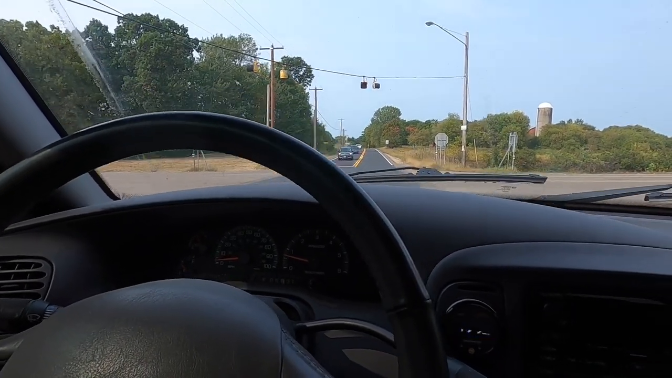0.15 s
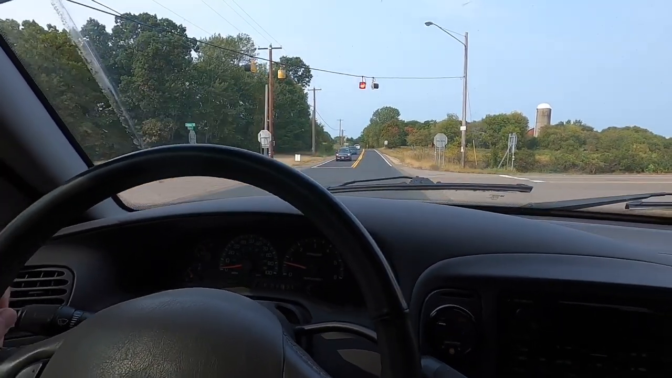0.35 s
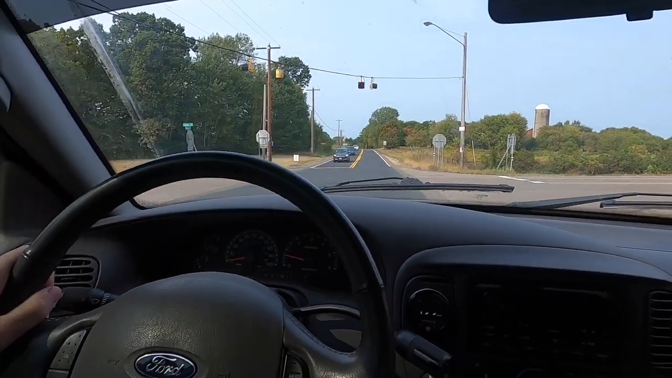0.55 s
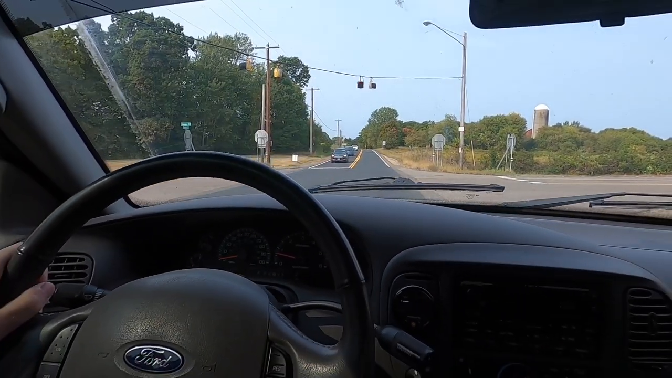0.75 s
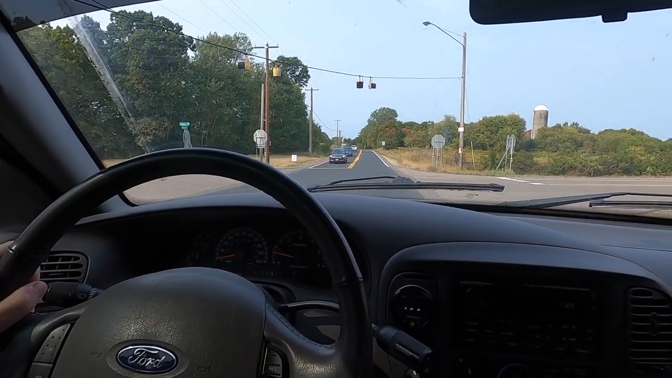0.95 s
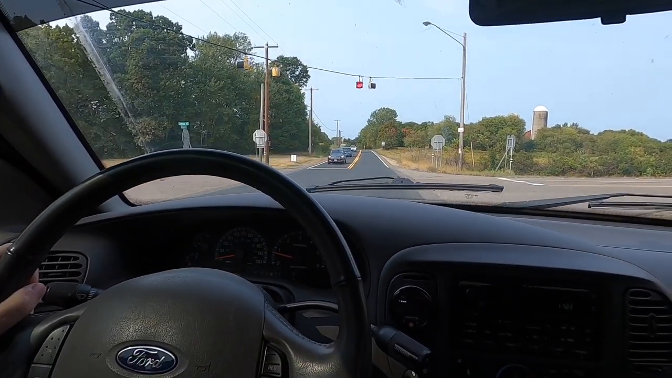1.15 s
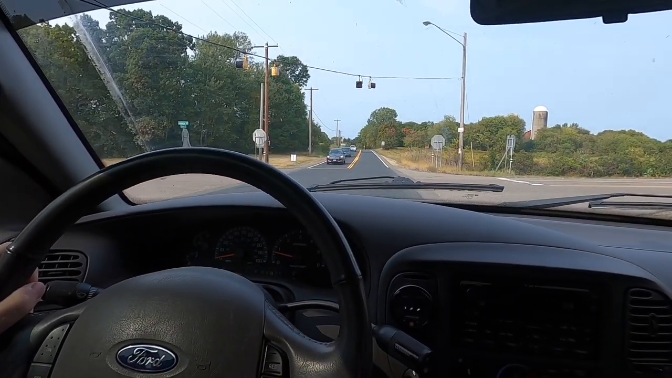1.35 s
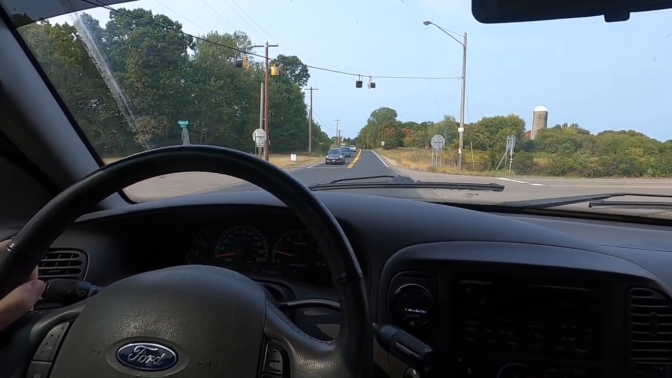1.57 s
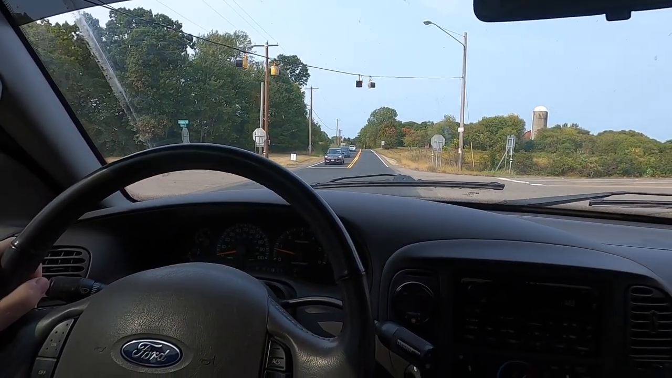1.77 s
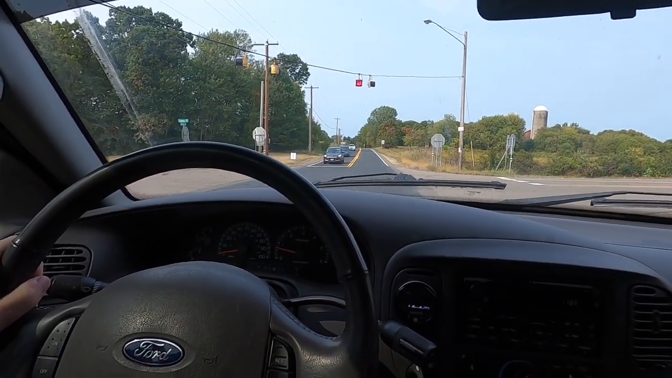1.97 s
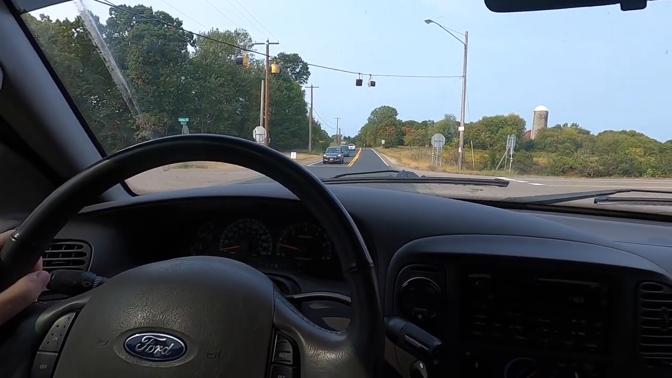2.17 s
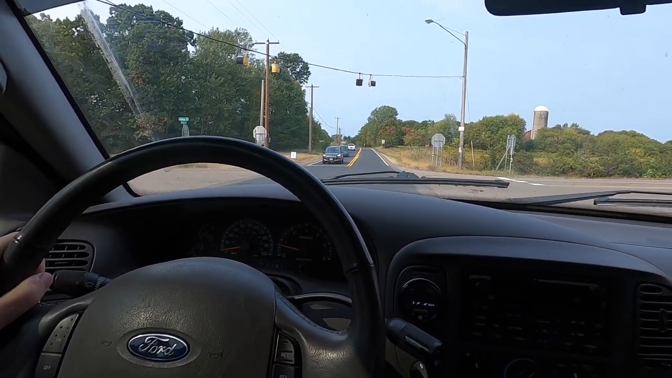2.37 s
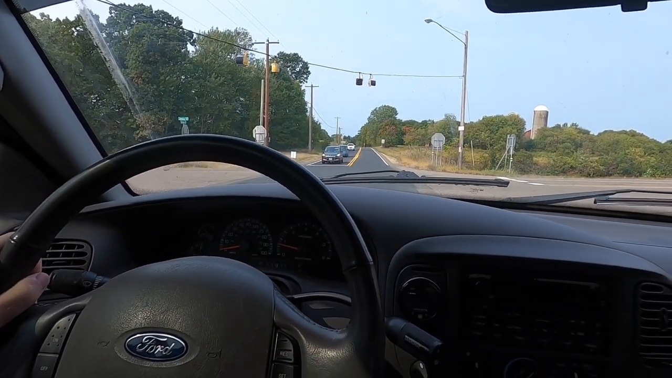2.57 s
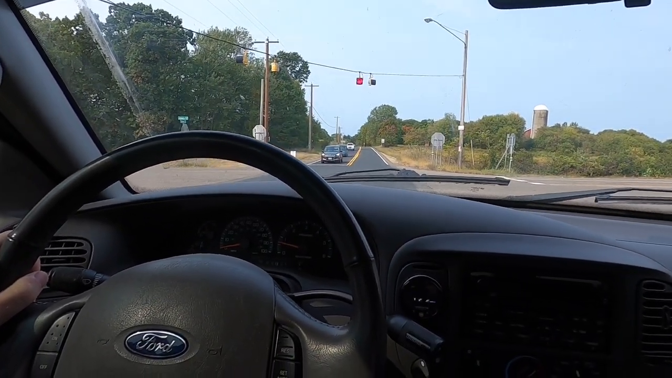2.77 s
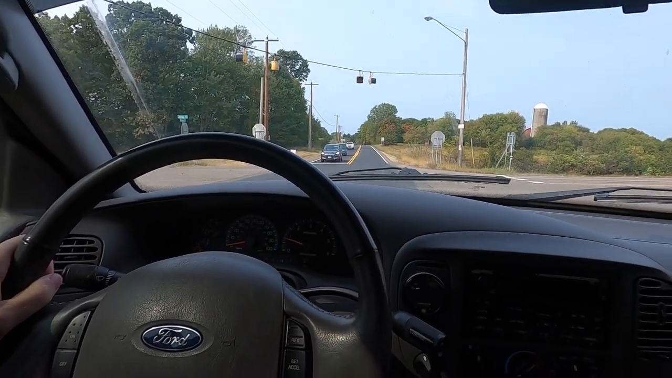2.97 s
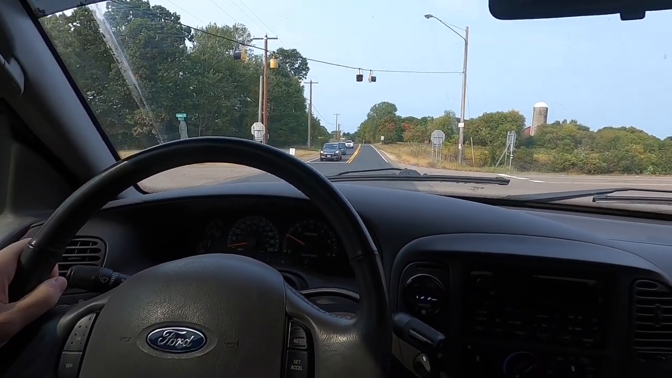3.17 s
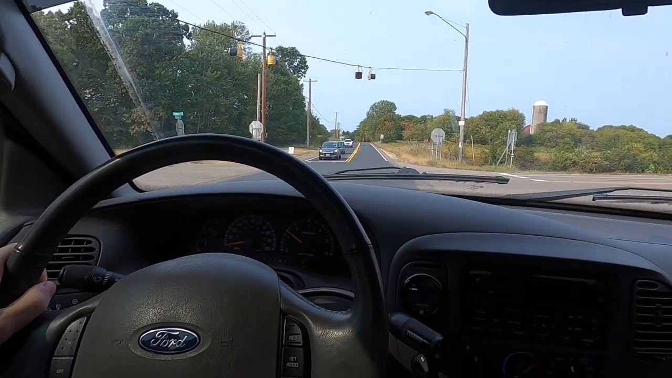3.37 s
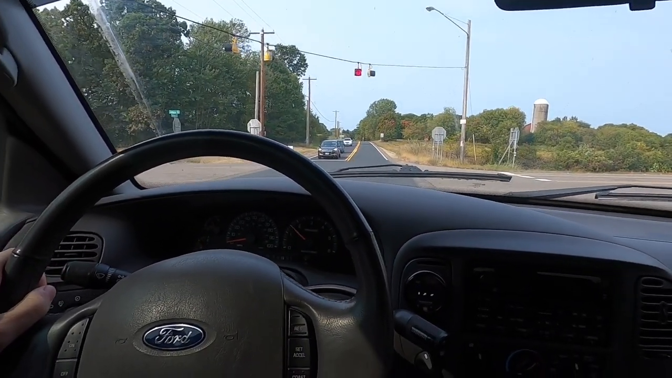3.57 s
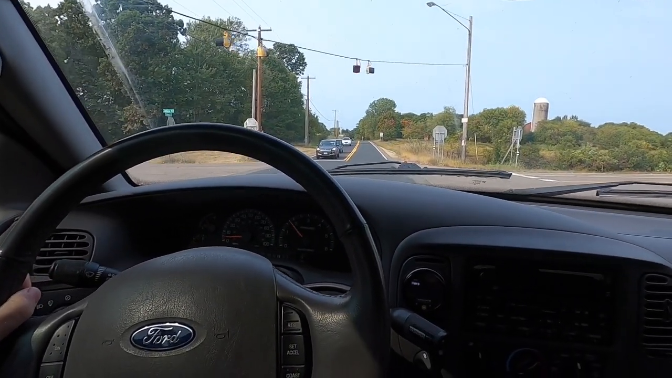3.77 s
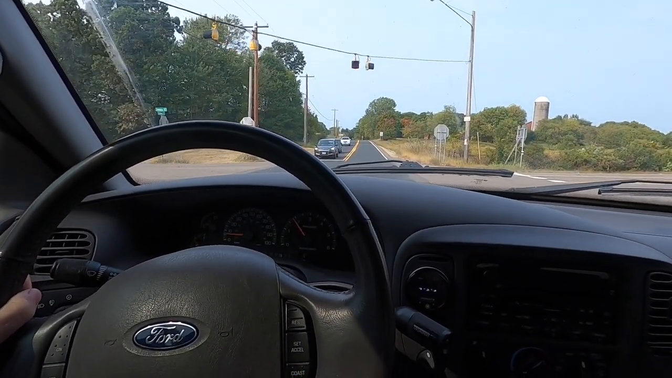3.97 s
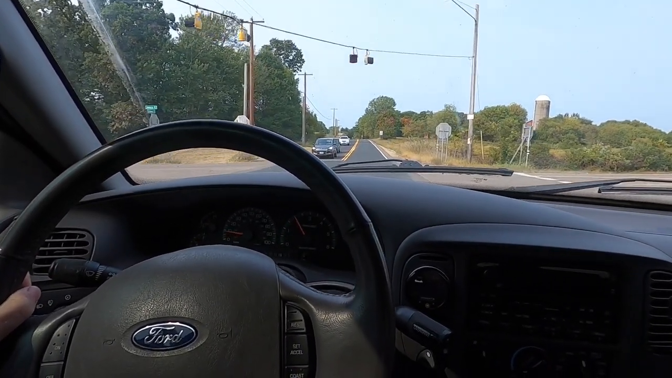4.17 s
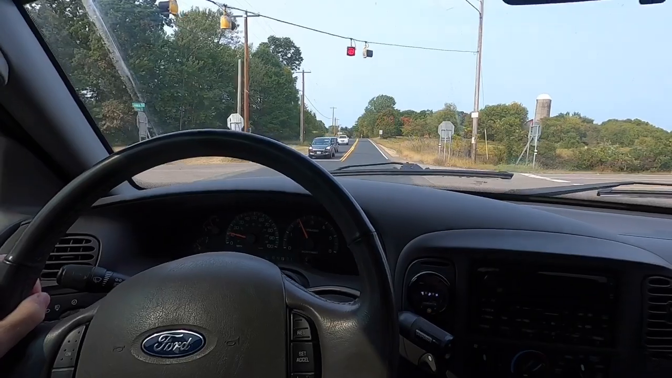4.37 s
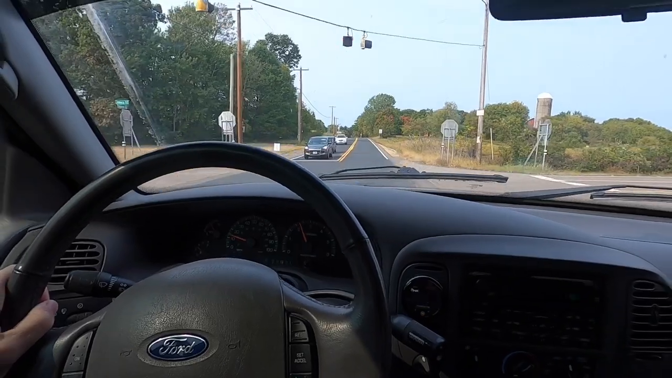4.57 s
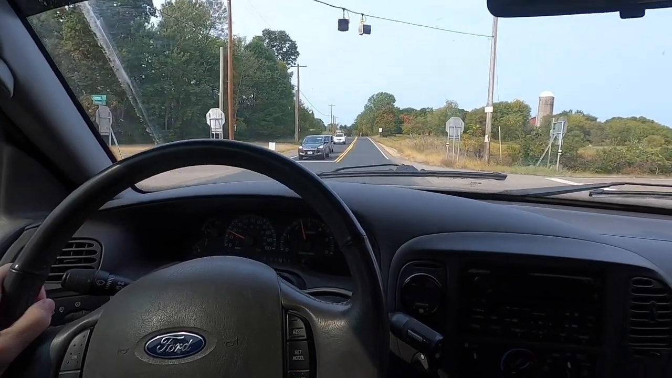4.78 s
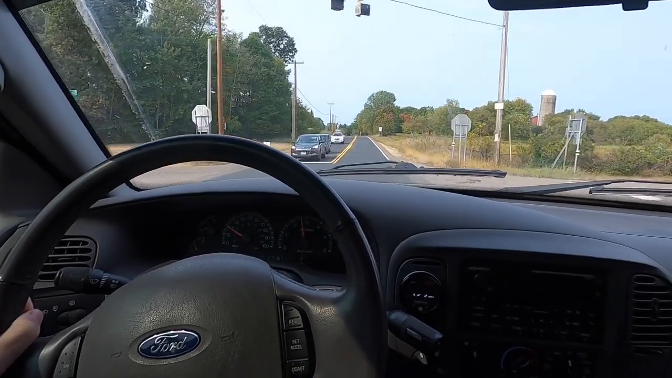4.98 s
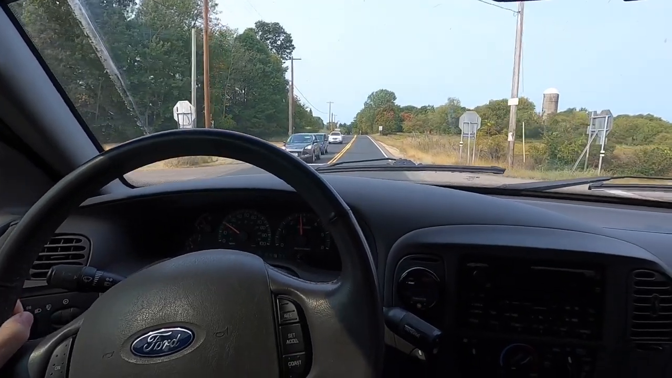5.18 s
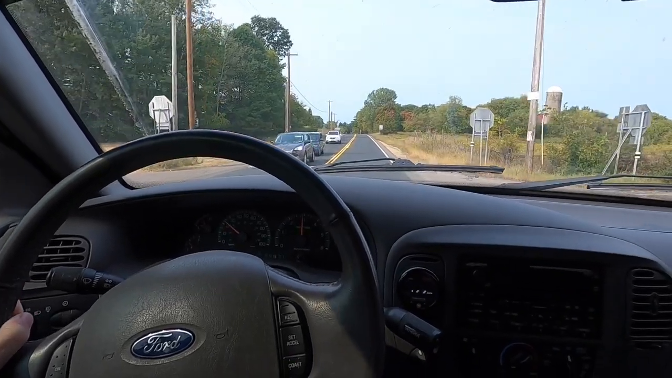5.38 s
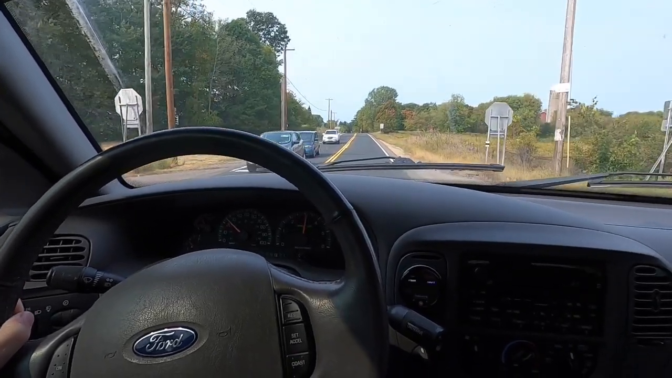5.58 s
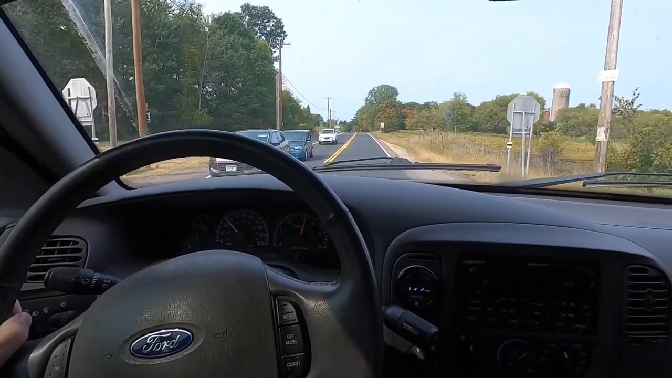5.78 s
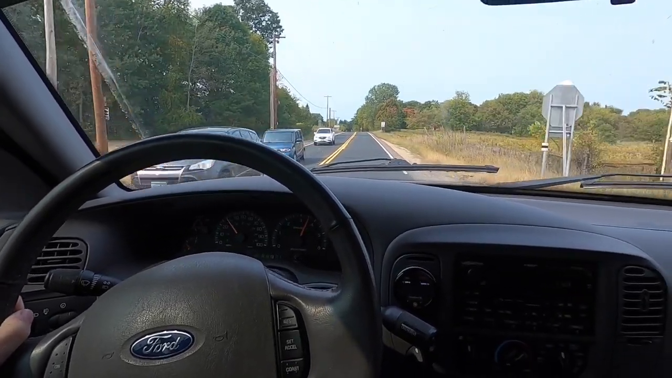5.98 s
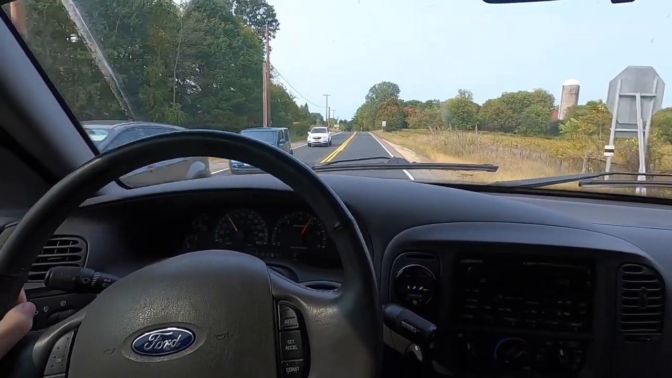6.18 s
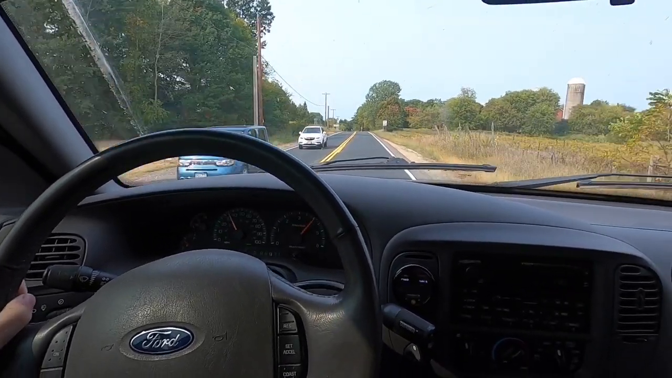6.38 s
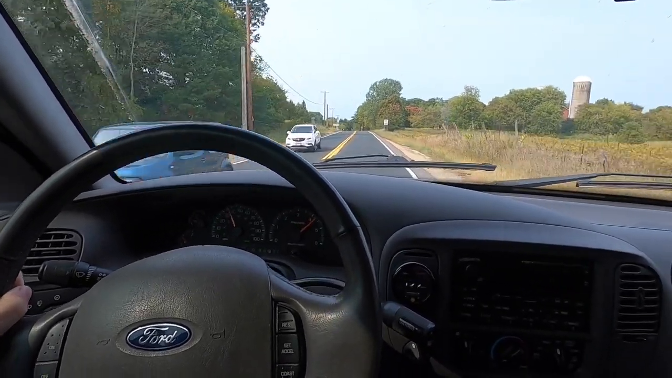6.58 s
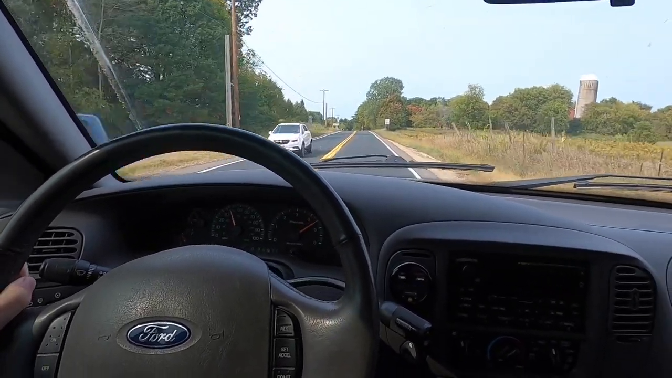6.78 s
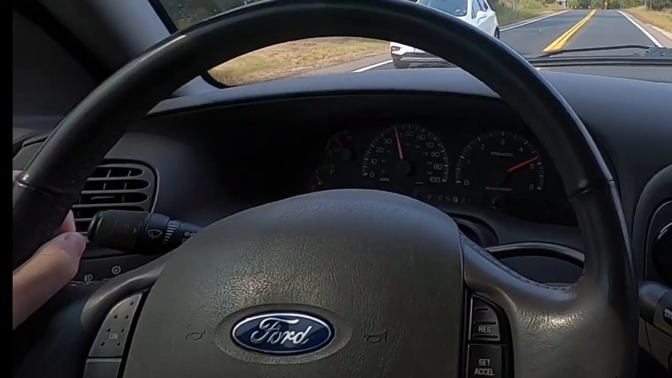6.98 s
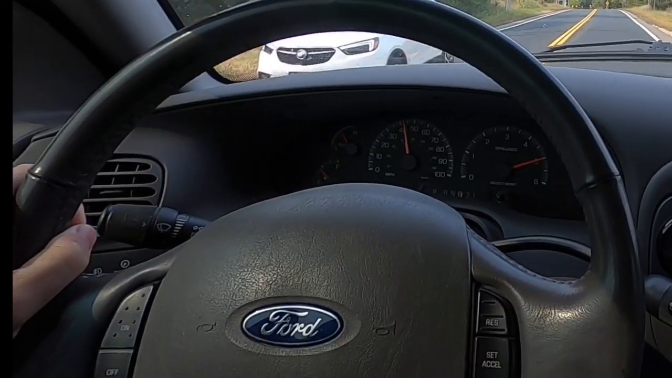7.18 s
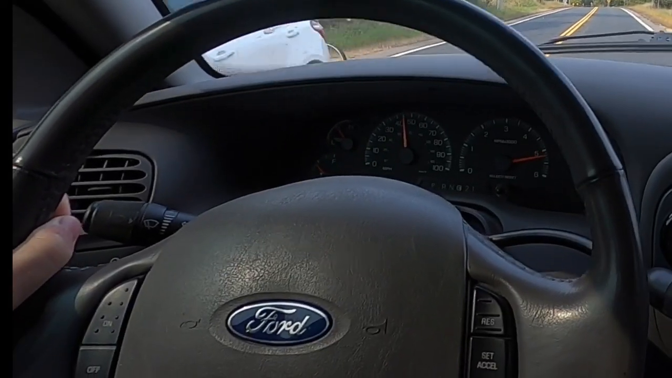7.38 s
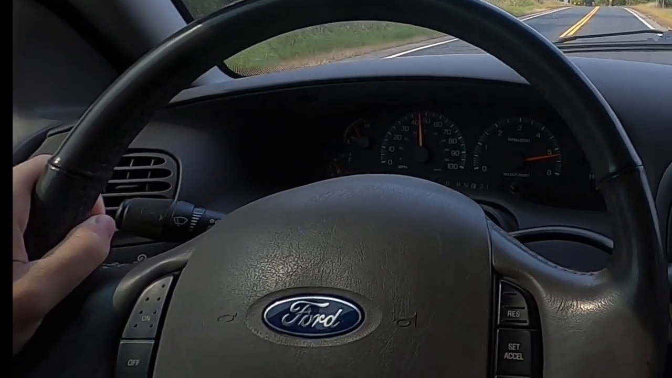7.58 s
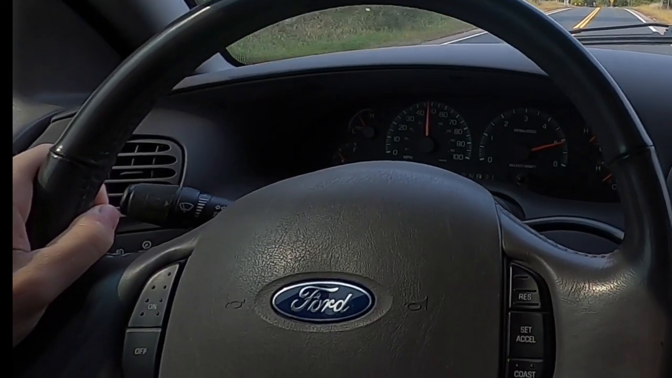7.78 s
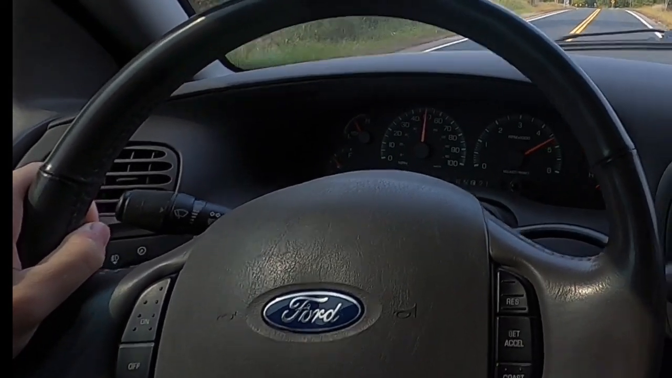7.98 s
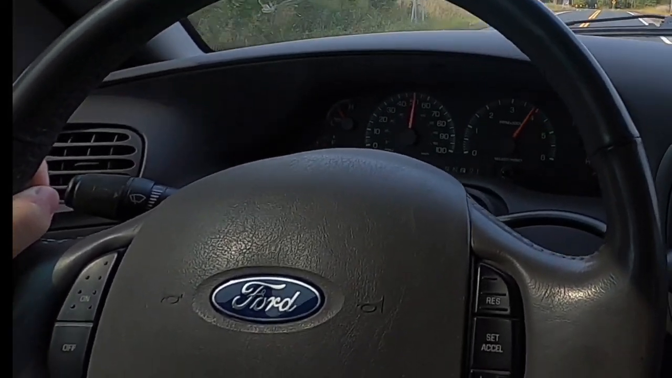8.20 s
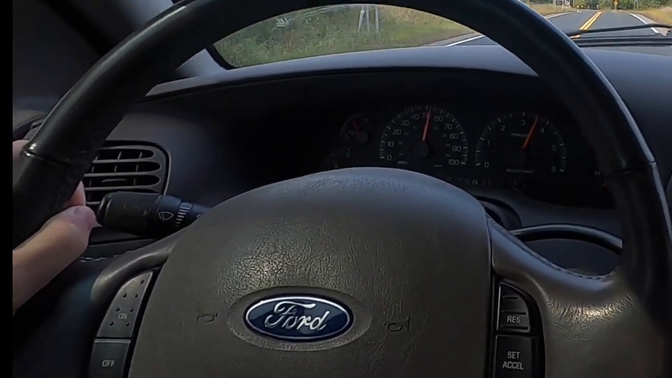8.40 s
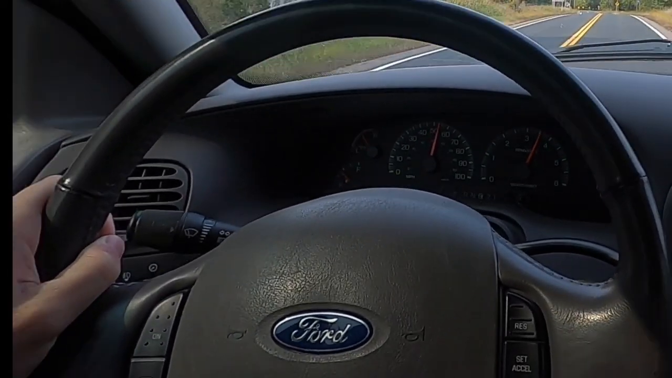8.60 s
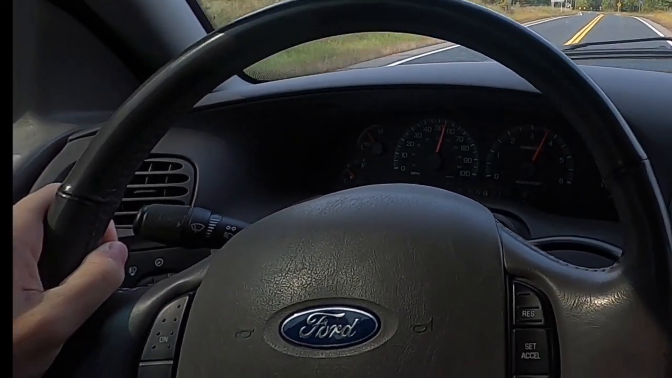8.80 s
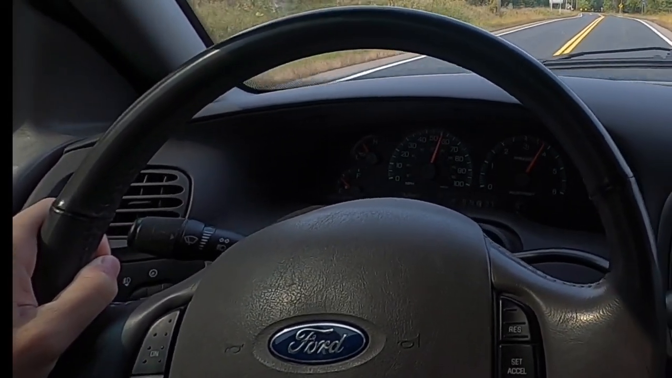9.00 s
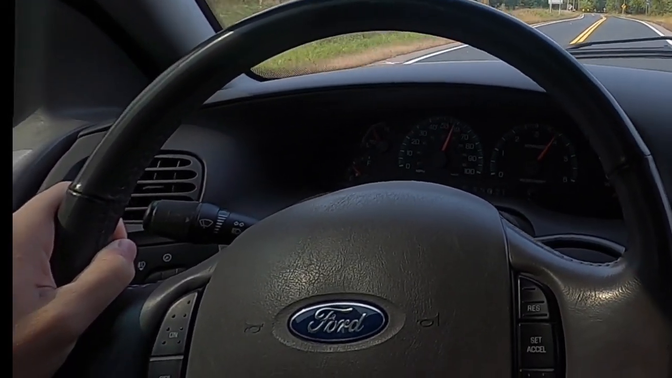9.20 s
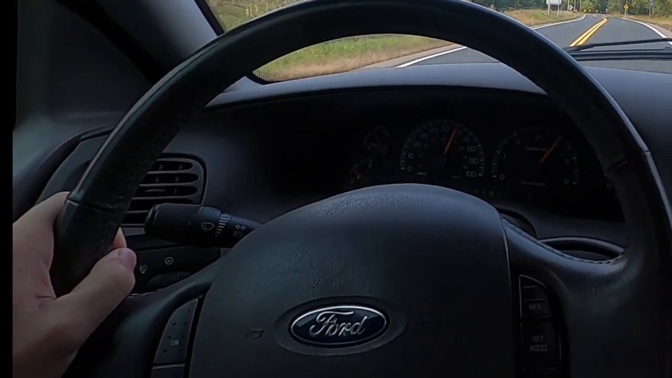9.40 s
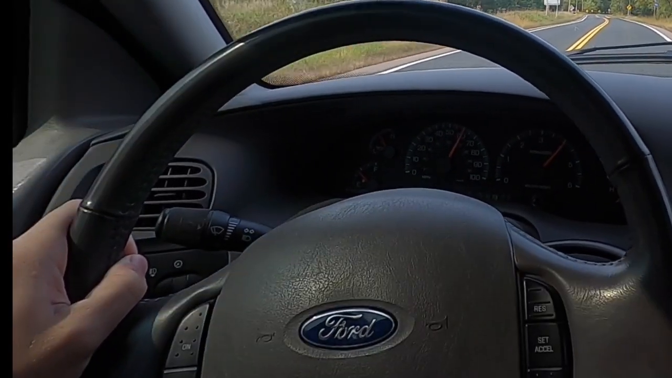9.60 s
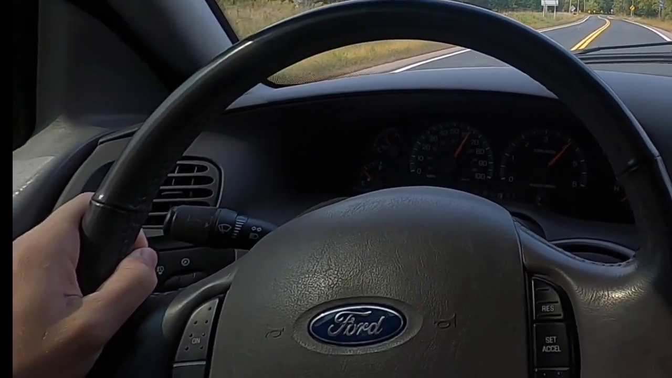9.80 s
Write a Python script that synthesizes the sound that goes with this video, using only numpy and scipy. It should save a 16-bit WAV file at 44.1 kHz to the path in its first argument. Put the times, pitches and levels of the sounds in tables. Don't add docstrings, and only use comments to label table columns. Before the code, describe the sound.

Close stereo inside a boomy truck cab. From 0 to 2.7 s a V8 idles low, lumpy and quiet over a faint accessory whine and soft noise floor. A shoe scuffs the mat around 1.8-2.1 s, small knocks follow at 2.2, then a tiny pedal squeak at 2.45 and a dull pedal thump at 2.55. At 2.9 s the engine lurches and revs rise fast; cloth rustles, and a cluster of plastic knocks with a short creak and bright snap lands at 3.4-3.8. The growl climbs continuously, booming in changing swells, with buzzing dash panels, intake hiss and a faint turbo whistle rising. Revs peak near 7.3 s, gearbox growl strains around 7.7, and pitch drops steeply until 8.05. The next gear grips with a deep surge; the turbo whistle dips and rebuilds while the engine pulls, climbing slowly and loudly to the cut at about 9.8 s.

```python
import sys
import numpy as np
from scipy import signal
from scipy.fft import rfft, irfft, next_fast_len
from scipy.io import wavfile
from scipy.ndimage import uniform_filter1d, map_coordinates

SR = 44100
rng = np.random.default_rng(int(sys.argv[2]) if len(sys.argv) > 2 else 0)


def undo_db(level):
    steps = np.asarray(level, float) / 20
    return 10 ** steps


def wrap_up_sound(samples):
    columns = np.atleast_2d(samples).T
    tamed = np.clip(columns, -1, 1)
    steps = np.round(tamed * 32767).astype(np.int16)
    wavfile.write(sys.argv[1], SR, steps)


N = 434385

# (time [s], four-stroke cycle rate [Hz])
SPEED = [(0, 5.4), (2.76, 5.5), (2.95, 8), (3.2, 11.1), (3.65, 14.75), (4.1, 17.3), (4.85, 22), (5.5, 26.7),
         (5.88, 30.6), (6.97, 41.8), (7.29, 44.65), (7.57, 42.5), (7.79, 39), (7.93, 34.3), (8.055, 29.1),
         (8.3, 29.5), (9.1, 33.2), (9.85, 35.4)]
# (time [s], throttle opening [dB], driveline pull [dB])
LOAD = [(0, -41, -2), (1.72, -44.5, 2), (1.88, -40, -5.5), (2.6, -39, 1.5), (2.8, -37.5, -3), (2.9, -29, 3),
        (3.04, -29, 3), (3.7, -27.5, 1), (4.25, -31, -0.5), (5.4, -32.5, 1), (5.75, -33, 0),
        (6.3, -26, 0.5), (7.0, -24, -1.5), (7.79, -23, -2), (7.96, -23, 1), (8.12, -28.5, -4),
        (9.22, -21.5, 0.5), (9.85, -20, 0.5)]
# (time [s], half length [s], cycle rate change [Hz])
HESITATE = [
    (4.74, .15, -.8),
    (8.01, .1, .6),
]
BOOM = {1: [(5.4, -57.5), (30, -36), (35, -36), (37, -26), (40, -37), (44.6, -32.5)], 2: [(5.4, -56.5),
        (25, -40.5), (31, -38.5), (36, -34.5), (40, -29.5), (44.6, -30.5)], 3: [(5.4, -53), (23, -38),
        (26, -27), (30.3, -18), (31.7, -23), (33.4, -34), (34.1, -18), (34.8, -15), (44.6, -10)],
        4: [(5.4, -60), (19, -44), (21.5, -30.5), (24, -45.5), (26, -43.5), (30.9, -21.5), (31.6, -12.5),
        (33.8, -16.5), (35, -28), (37, -43), (44.6, -37.5)], 5: [(5.4, -49.5), (13, -42.5), (16.5, -24),
        (20.6, -17.5), (21.3, -20.5), (22, -12.5), (25.5, -14), (27, -16), (29, -18), (30.2, -27),
        (31.3, -22), (36, -32.5), (41, -26), (44.6, -36)], 6: [(5.4, -47), (14, -41), (16.2, -30.5),
        (19, -34), (21, -41), (23, -35), (30, -39), (35, -30), (39.5, -34.5), (41, -40.5), (42.5, -30),
        (44.6, -29)], 8: [(5.4, -31), (9, -32.5), (14.2, -30), (15.2, -20.5), (17.3, -18.5), (18.4, -28.5),
        (18.9, -36), (19.7, -27.5), (23.5, -40.5), (27, -33.5), (30.5, -24.5), (33, -26), (34.8, -32),
        (36.5, -27), (44.6, -25)]}
GROWL = {7: [(5.4, -53.5), (11, -33), (13, -32), (14.7, -24.5), (16.2, -35), (19, -33.5), (21, -49),
         (23.5, -40), (28, -49), (31, -30.5), (37, -40), (40, -31.5), (44.6, -29.5)], 9: [(5.4, -54),
         (11, -31), (16, -45.5), (20, -50.5), (27, -53), (31, -41), (37, -40), (42, -33.5), (44.6, -32.5)],
         10: [(5.4, -51), (14, -42.5), (17, -46.5), (24, -35), (27, -42), (35, -39), (40, -34.5),
         (44.6, -42)], 11: [(5.4, -54.5), (12, -34.5), (17, -42), (21, -42.5), (29, -39), (31, -50),
         (38, -28.5), (44.6, -37)], 13: [(5.4, -60), (12, -36.5), (15, -50), (19, -37.5), (27, -45.5),
         (33, -34.5), (37, -43.5), (41, -55), (44.6, -38)], 16: [(5.4, -58), (13, -36.5), (19, -41.5),
         (24, -48), (25.5, -33.5), (29, -39), (35, -47), (40, -56.5), (44.6, -39.5)], 17: [(5.4, -65),
         (15, -46.5), (33, -51.5), (35, -53.5), (39, -35.5), (42, -37.5), (44.6, -55)], 21: [(5.4, -61),
         (15, -44), (22, -57), (31, -56), (35, -55.5), (37, -42), (40, -39.5), (42, -40), (43.5, -44)]}
# (order [multiple], level [dB])
MINOR_ORDERS = [(12, -5), (14, -3), (15, -0.5), (18, -3), (19, -0.5), (20, -8.5), (22, -3), (23, -11),
                (24, 0.5), (25, -6.5), (26, -3.5), (27, -8.5), (28, -8.5), (29, -10.5), (30, -3.5),
                (31, -9), (32, -8)]
# (frequency [Hz], gain [dB])
CAB = [(20.0, 4.5), (45.0, -10), (75.0, 9.5), (150.0, 2), (200.0, -5.5), (250.0, -0.5), (300.0, -2.5),
       (370.0, 1.5), (440.0, 0), (520.0, -18), (620.0, -14), (800.0, -17), (1000.0, -12.5), (1450.0, -17.5)]
NEXT_GEAR_DB = {1: 0, 2: 1.5, 3: 1, 4: -0.5, 5: 1, 6: 3.5, 8: 0, 7: -1, 9: 4.5, 10: -8, 11: 4.5, 13: 6, 16:
                4, 17: 2, 21: 8.5}
SLIP_DB = {1: 0, 2: 2.5, 3: 1, 4: -12.5, 5: 4, 6: -8, 8: 0.5, 7: -5, 9: -2.5, 10: -2.5, 11: -13, 13: 1.5,
           16: -1, 17: -3, 21: -0.5}
# (time [s], half length [s], share [0-1])
BITE = [
    (8.15, .55, 1),
]
BITE_DB = {1: -6, 3: 10.5, 4: -8.5, 6: -2, 7: -17.5, 8: -12, 9: -13.5, 11: 4.5, 13: 3}
SETTLE_DB = {3: -1.5, 6: -1, 8: 7.5, 9: 2, 13: -1.5}
# (time [s], half length [s], gain [dB])
LUG = [
    (3.5, .4, 2),
    (4.4, 0.42, 3),
    (6.9, .8, 2.5),
    (7.7, .3, 1),
    (9.3, .6, 0.5),
]
SHIFT_S, SETTLE_S = 8.05, 9.22

# (frequency [Hz], correlation [0-1])
ALIKE = [(60, .995), (220, 1), (400, .97), (650, 0.75), (1000, .9), (1800, 0.85), (3500, .62), (7000, 0.4),
         (12000, 0.5)]
# (frequency [Hz], density [dB per Hz])
BODY = [(32, -35), (55, -9.5), (69, -15.5), (92, -9), (210, -18), (267, -17.5), (386, -24.5), (600, -45),
        (780, -78.5), (1320, -120)]
SHAKE = [(8, -10), (22, -1), (34, -2), (50, -12), (90, -45), (150, -120)]
# (time [s], half length [s], gain [dB])
BUMPS = [(0, 0.17, 17), (2.9, 0.18, 16.5), (3.7, .2, 13), (4.25, .2, 6.5), (4.55, 0.35, 20.5),
         (5.6, 0.26, 3.5), (7.0, .15, 7), (8.0, 0.088, 17.5), (8.38, 0.11, 10.5), (8.8, 0.22, -5.5),
         (9.15, .25, 8.5)]
IDLE_DB, SHAKE_DB = -44, -37
BODY_DB, BODY_GROWS = -30, 0.45
# (frequency [Hz], density [dB per Hz])
ROAR = [(280, -28.5), (480, -3), (699, -14.5), (757, -12.5), (1120, -13.5), (1700, -19), (2210, -32),
        (3740, -120)]
HISS = [(1000, -28), (1700, -3.5), (2900, -4.5), (4250, -12.5), (4700, -15), (5900, -19.5), (6900, -18.5),
        (9500, -32), (12900, -43.5), (15600, -50)]
# (cycle rate [Hz], level [dB])
REVS = [(5.4, -68.5), (10, -62.5), (15, -55), (18, -56.5), (22, -49.5), (32, -49.5), (38, -46),
        (44.6, -44.5)]
ROAR_GROWS, HISS_GROWS = 0.59, 0.37
# (time [s], half length [s], gain [dB])
FLARES = [
    (3.25, .35, -2),
    (4.9, 0.27, 1),
    (6.8, 0.11, 3.5),
    (7.76, 0.42, 4),
    (8.18, 0.2, 5.5),
    (8.92, 0.17, 3),
]
# (time [s], level [dB])
STRAIN = [
    (7.3, -90.5),
    (7.48, -52.5),
    (7.72, -36),
    (7.9, -41.5),
    (8.02, -55.5),
    (8.15, -92.5),
]
# (frequency [Hz], width [Hz], gain [dB])
HOUSING = [(890, 90, -1), (1030, 110, -2), (1100, 90, -1.5), (1250, 90, -4.5)]
# (frequency [Hz], width [Hz], gain [dB])
DASH = [(555, 8.4, 0.5), (700, 22, 4.5), (885, 19, 2.5), (1000, 17, -0.5), (1134, 21, 4.5), (1250, 15, 4.5),
        (1460, 83, 5), (1558, 30, 6.5)]
VENTS = [(1790, 21, -3), (1970, 20, 0.5), (2085, 19, -9), (2256, 38, 2.5), (2880, 31, -2), (3330, 31, -5.5),
         (3760, 41, -7), (3980, 57, -2), (4220, 120, -5), (5200, 56, 0.5), (5580, 110, -0.5)]
# (cycle rate [Hz], gain [dB])
RINGING = [(5.4, -5), (16, -4), (21, 3), (27, 3), (31, -5), (44.6, -7)]
# (whistle frequency [Hz], level [dB])
INTAKE = [(600, -59), (1100, -70.5), (1300, -75), (1900, -58.5), (2600, -53), (3900, -50.5), (5200, -51),
          (7000, -47.5)]
# (time [s], half length [s], gain [dB])
GULPS = [
    (5.7, .2, 0.5),
    (9.05, 0.13, 0.5),
    (3.1, 0.11, 9.5),
    (4.1, 0.44, -7.5),
    (6.3, 0.94, 1.5),
    (7.6, 0.56, -1),
    (8.4, 0.21, -3.5),
]

# (frequency [Hz], density [dB per Hz])
HUM = [(450, -40), (600, -8), (930, -11), (1040, -5), (1130, -11), (1400, -13), (1700, -13), (2000, -24),
       (4000, -30), (7000, -33), (10000, -39), (12000, -56)]
# (frequency [Hz], level [dB])
WHINE = [(931.3, -80), (1680, -81.5)]
# (time [s], frequency [Hz])
WANDER = [
    (0, 1025),
    (.2, 1040),
    (1.2, 1040),
    (1.38, 1020),
    (1.6, 1070),
    (1.9, 1045),
    (2.7, 1048),
]
HUM_DB, ALTERNATOR_DB = -68.5, -71.5

# (time [s], level [dB])
SCUFF = [
    (1.79, -71.5),
    (1.852, -60.5),
    (1.94, -71.5),
    (1.974, -59),
    (2.042, -50),
    (2.116, -66.5),
    (2.16, -65),
]
# (frequency [Hz], density [dB per Hz])
SOLE = [(290, -28.5), (500, -5), (818, -17), (910, -17), (998, -12.5), (5620, -21), (12000, -40.5),
        (15600, -80.5), (22000, -120)]
# (time [s], level [dB])
RUSTLE = [
    (2.2, -73),
    (2.4, -71),
    (3.1, -64.5),
    (3.35, -67),
    (3.62, -60),
    (3.9, -66),
    (4.6, -76),
    (5, -110),
]
# (time [s], level [dB])
CREAK = [
    (3.3, -80),
    (3.366, -67),
    (3.721, -44),
    (4.0, -77.5),
]
# (frequency [Hz], width [Hz], gain [dB])
TRIM = [(1580, 200, 3.5), (2860, 490, -16)]
# (time [s], frequency [Hz], level [dB])
SQUEAK = [
    (2.4, 1970, -110),
    (2.425, 1970, -66),
    (2.48, 1930, -61),
    (2.51, 1920, -110),
]

# (time [s], 1.5 kHz ring peak [dB], thud [dB re ring], 2.8 kHz ring [dB re ring], crack [dB re ring])
KNOCKS = [(2.1846, -38, 10, -14, -15), (2.203, -47.5, 10, -20, -30), (2.552, -37, 4.3, 4.5, -3.5),
          (2.8637, -61, 19, -22, -18), (2.9188, -60, 17, 12, 0), (3.28, -62, 13, 10, 3),
          (3.452, -66.5, 8, 4, 10), (3.534, -38, 8, -16, -19), (3.562, -41.5, 12, -1, -19),
          (3.553, -53, 1, 6, -6), (3.576, -53, 1, 6, -8), (3.607, -41, 6, -13, -22),
          (3.633, -50, 0, 5, -10), (3.671, -48, -2, 9, -7), (3.681, -30.5, 4, -18, -24),
          (3.658, -31.5, 3, 0, -21), (3.6872, -24, 8, -8, -30), (3.7299, -31.5, 12, -2, 2),
          (3.773, -45.5, 6, -14, -16)]
KNOCK_T60 = [0.065, 0.051, 0.06, 0.062]
# (time [s], level [dB], t60 [s])
SNAP = [
    (3.7312, -43, .05),
]
# (frequency [Hz], level [dB], t60 [s])
THUMP = [(69, -18.5, 0.39), (87.7, -20.5, 0.76), (125, -17.5, 0.51), (246, -15, 0.065), (409, -19.5, 0.055)]
LURCH = [(302, -28.5, 0.2), (379, -26, 0.21), (462, -29.5, 0.13)]
THUMP_S, LURCH_S = 2.5615, 2.885

# (time [s], whistle frequency [Hz])
TURBO = [(2, 600), (3.1, 1300), (3.9, 1900), (4.3, 2600), (4.9, 4000), (5.7, 5050), (6, 5620), (6.68, 6510),
         (7.05, 6870), (7.3, 7010), (7.48, 6980), (7.75, 5900), (8, 5250), (8.3, 5160), (8.6, 5850),
         (8.9, 6400), (9.3, 6790), (9.85, 6980)]
# (whistle frequency [Hz], level [dB])
WHISTLE = [(1900, -130), (2250, -90), (4700, -80), (5100, -63), (6000, -61.5), (6800, -61), (7000, -58.5)]
AIRY = [(1900, -100), (2250, -53), (3250, -51.5), (4300, -64), (5300, -61), (6000, -68), (7000, -70)]
SURGE = [(5000, -90.5), (5500, -56), (6100, -50), (6500, -54), (7000, -58.5)]
# (time [s], half length [s], gain [dB])
FADES = [
    (8.15, 0.17, -4),
    (8.85, .2, -2),
]
SPOOL_DB = 1.5

# (frequency [Hz], left over right [dB])
TILT = [(25, -5), (43, -1.5), (80, 0.4), (125, 1.5), (220, 2), (400, 4.5), (650, -0.5), (1000, 1.5),
        (1800, 2), (3500, 3.5), (7000, 1.5)]
# (frequency [Hz], lead [rad])
LEAD = [(40, 0.53), (125, 0.18), (220, 0.39), (400, -0.35), (650, -0.97), (1000, -.25), (1800, -0.8),
        (3500, -0.91), (7000, 0.38), (15000, -0.97)]


def unit(x):
    return x / np.sqrt(np.mean(x ** 2) + 1e-20)


def along(points, hz):
    f, v = np.transpose(points)
    return np.interp(np.log(hz + 1), np.log(f + 1), v)


def curves(rows, size=1):
    s, *cols = np.transpose(rows)
    return [np.interp(np.arange(0, N, size) / SR, s, c) for c in cols]


def swells(rows):
    t = np.arange(N) / SR
    return sum(height * np.interp(t, [s - half, s, s + half], [0, 1, 0]) for s, half, height in rows)


def wobble(rate, count=N):
    knots = rng.standard_normal(int(N * rate / SR) + 4)
    fine = map_coordinates(knots, [np.arange(0, N * rate / SR, .1)])
    return np.interp(np.linspace(0, len(fine) - 1, count), np.arange(len(fine)), fine)


def filtered(x, response):
    m = next_fast_len(N + SR // 4)
    return irfft(rfft(x, m) * response(np.fft.rfftfreq(m, 1 / SR)), m)[..., :N]


def peaks(modes, f):
    return sum(undo_db(db) * w * w / (4 * (f - c) ** 2 + w * w) for c, w, db in modes)


def rush(gain, gate=1):
    def mid_side(hz):
        turn = np.arccos(np.clip(along(ALIKE, hz), -1, 1)) / 2
        return gain(hz) * np.array([np.cos(turn), np.sin(turn)])

    mid, side = filtered(gate * rng.standard_normal((2, N)), mid_side)
    return unit(np.array([mid + side, mid - side]))


def shaped(spectrum):
    return rush(lambda f: undo_db(along(spectrum, f)))


def exhaust():
    step = 8
    cycle_hz = curves(SPEED, size=step)[0] + swells(HESITATE)[::step]
    throttle_db, pull_db = curves(LOAD, size=step)
    turns = np.cumsum(cycle_hz) * step / SR
    chance = lambda rate: wobble(rate, count=len(turns))
    lumpy = np.clip(35 / cycle_hz, 1, 2.6) ** 2.5

    shifted, = curves([(SHIFT_S - .07, 0), (SHIFT_S, 1)], size=step)
    bite = shifted * swells(BITE)[::step]
    settled = np.arange(0, N, step) / SR > SETTLE_S
    slowing = -np.gradient(cycle_hz) * SR / step
    slip = uniform_filter1d(np.clip(slowing / 30, 0, 1), size=300)

    tone = np.zeros(len(turns))
    for k, points in {**BOOM, **GROWL}.items():
        db = along(points, cycle_hz) + pull_db + NEXT_GEAR_DB[k] * shifted + SLIP_DB[k] * slip
        db = db + BITE_DB.get(k, 0) * bite + SETTLE_DB.get(k, 0) * settled
        loose = np.clip((-8 - db) / 18, .3, 1)
        sway_db = loose * (1.1 + .07 * lumpy + .05 * k) * chance(16)
        if k > 8:
            sway_db += .14 * k * chance(6)
        drift = .002 * k * (lumpy if k in GROWL else 1) * chance(20)
        tone += undo_db(db + 3 + sway_db) * np.sin(2 * np.pi * (k * turns + drift + rng.random()))

    lug_db = swells(LUG)[::step]
    for k, db in MINOR_ORDERS:
        level_db = throttle_db - 9 + lug_db + db + along(CAB, k * cycle_hz) + 2.2 * chance(5)
        gain = undo_db(level_db) * (1 + peaks(DASH, k * cycle_hz))
        drift = .0007 * k * (1 + k / 40) * lumpy * chance(25)
        tone += gain * np.sin(2 * np.pi * (k * turns + drift + rng.random()))
    return signal.resample_poly(tone, step, 1, window=("kaiser", 12))[:N]


def opening():
    return curves(LOAD)[0] - IDLE_DB


def body_rumble():
    body_db = BODY_DB + BODY_GROWS * opening() - 10 + 0.8 * wobble(6.9)
    shake_db = SHAKE_DB + swells(BUMPS) + wobble(17)
    return undo_db(body_db) * shaped(BODY) + undo_db(shake_db) * shaped(SHAKE)


def hum():
    drift = .004 * wobble(3)
    whine = sum(undo_db(db + 4) * np.sin(2 * np.pi * hz * np.cumsum(1 + drift) / SR) for hz, db in WHINE)
    alternator_hz = curves(WANDER)[0] * (1 + drift / 2)
    whine += undo_db(ALTERNATOR_DB) * np.sin(2 * np.pi * np.cumsum(alternator_hz) / SR)
    return undo_db(wobble(4.6)) * whine + undo_db(HUM_DB) * shaped(HUM)


def rubbing():
    scuff_db, = curves([(1.6, -100)] + SCUFF + [(2.2, -130)])
    creak_db, = curves([(3.2, -130)] + CREAK + [(4.1, -130)])
    squeak_hz, squeak_db = curves(SQUEAK)
    scuff = (undo_db(scuff_db) + undo_db(curves(RUSTLE)[0])) * undo_db(1.5 * wobble(90)) * shaped(SOLE)
    creak = undo_db(creak_db + 2.5 * wobble(60)) * rush(lambda f: peaks(TRIM, f))
    squeak = undo_db(squeak_db) * np.sin(2 * np.pi * np.cumsum(squeak_hz) / SR)
    return scuff + creak + squeak


def panels(spectrum, gate, ring):
    plain = rush(lambda f: undo_db(along(spectrum, f)), gate=gate)
    return unit(plain + ring * filtered(plain, lambda f: peaks(DASH + VENTS, f)))


def combustion(cycle_hz, puffs, ring):
    roar_db = along(REVS, cycle_hz) + ROAR_GROWS * opening() + swells(FLARES)
    return undo_db(roar_db + 0.54 * wobble(8.9)) * panels(ROAR, puffs, ring)


def gearbox(puffs):
    strain_db, = curves(STRAIN)
    return undo_db(strain_db + 1.6 * wobble(25)) * rush(lambda f: peaks(HOUSING, f) ** 2, gate=puffs)


def intake(puffs, ring):
    whistle_hz, gulp_db = curves(TURBO)[0], swells(GULPS)
    hiss_db = along(INTAKE, whistle_hz) + HISS_GROWS * opening() + gulp_db
    boost = np.maximum(2.1 * (whistle_hz / 6000 - 1) + 0.19 * gulp_db, -.3)
    hiss = undo_db(hiss_db + 1.1 * wobble(3.9)) * panels(HISS, puffs, ring)
    return hiss + boost * np.diff(hiss, prepend=0)


def cab_echo(x, ring):
    t = np.arange(SR // 10) / SR
    tail = rng.standard_normal(len(t)) + 1.2 * rng.standard_normal((2, len(t)))
    tail *= undo_db(-60 * t / .09)
    wet = signal.oaconvolve(x, tail / np.linalg.norm(tail[0]), axes=1)[:, :N]
    return .94 * x + .32 * np.minimum(ring, 1) * wet


def roar():
    cycle_hz, = curves(SPEED)
    firing = 8 * np.cumsum(cycle_hz) / SR
    puffs = 1 + .2 * np.cos(2 * np.pi * firing) + .12 * np.cos(2 * np.pi * firing * 3 / 8)
    ring = undo_db(along(RINGING, cycle_hz))
    noise = combustion(cycle_hz, puffs, ring) + gearbox(puffs) + intake(puffs, ring)
    rise = np.clip(np.arange(N) / SR - 1.9, 0, 1)
    return cab_echo(noise, ring) * rise


def knocks():
    t = np.arange(SR // 4) / SR
    edges_hz = ((900, 1800), (230, 640), (2300, 3400), (3400, 6500))
    bands = [signal.butter(3, edge, "bandpass", fs=SR, output="sos") for edge in edges_hz]
    out = np.zeros((2, N + SR))
    for s, db, *rel_db in KNOCKS:
        noise = rng.standard_normal(len(t)) + 0.069 * rng.standard_normal((2, len(t)))
        colour = 0
        for band, gain_db, t60 in zip(bands, [0, *rel_db], KNOCK_T60):
            colour = colour + undo_db(gain_db - 60 * t / t60) * unit(signal.sosfilt(band, noise))
        out[:, round(s * SR):][:, :len(t)] += undo_db(db - 4.5) * (1 - np.exp(-t / .002)) * colour
    bright_band = signal.butter(2, (5500, 13000), "bandpass", fs=SR, output="sos")
    for s, db, t60 in SNAP:
        noise = rng.standard_normal(len(t)) + .4 * rng.standard_normal((2, len(t)))
        bright = unit(signal.sosfilt(bright_band, noise))
        out[:, round(s * SR):][:, :len(t)] += undo_db(db - 60 * t / t60) * bright
    return out[:, :N]


def struck(start_s, modes, rise_s):
    t = np.arange(SR // 4) / SR
    ring = sum(undo_db(db - 60 * t / t60) * np.sin(2 * np.pi * hz * t) for hz, db, t60 in modes)
    out, start = np.zeros(N), round(start_s * SR)
    out[start:start + len(t)] = ring * (1 - np.exp(-t / rise_s))
    return out


def pedal_thump():
    return struck(THUMP_S, THUMP, rise_s=0.0024)


def mount_lurch():
    return struck(LURCH_S, LURCH, rise_s=0.0064)


def turbo():
    hz, = curves(TURBO)
    spin_down = np.clip(np.gradient(hz) * SR / 3000, -1, 0)
    line_db = along(WHISTLE, hz) + SPOOL_DB * spin_down + swells(FADES) + 1.5 * wobble(14)
    line = undo_db(line_db) * (.8 + .4 * wobble(120))
    air = undo_db(along(AIRY, hz)) * np.array([wobble(450), wobble(490)])
    jittered_hz = hz + 7 * wobble(60) + 6 * wobble(7)
    whistle = (line + air) * np.sin(2 * np.pi * np.cumsum(jittered_hz) / SR)
    octave_below = np.sin(np.pi * np.cumsum(hz) / SR)
    surge = undo_db(along(SURGE, hz)) * np.array([wobble(500), wobble(540)]) * octave_below
    return surge + whistle


def scene():
    cab = exhaust() + body_rumble() + hum() + rubbing() + roar()
    cab += knocks() + pedal_thump() + mount_lurch() + turbo()
    cab *= np.clip(np.arange(N) / (.004 * SR), 0, 1)
    port = lambda hz: undo_db(along(TILT, hz) / 2) * np.exp(.5j * along(LEAD, hz))
    return filtered(cab, lambda hz: np.array([port(hz), 1 / port(hz)]))


def band_limit(x):
    return signal.sosfilt(signal.butter(12, 15710, fs=SR, output="sos"), x)


def record(dry):
    return band_limit(dry)


dry = scene()
out = record(dry)
wrap_up_sound(out)
```